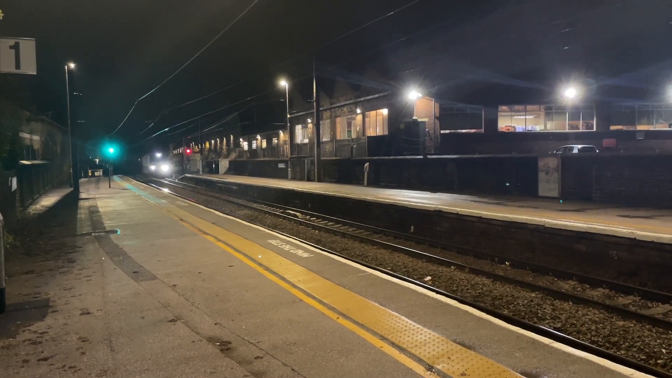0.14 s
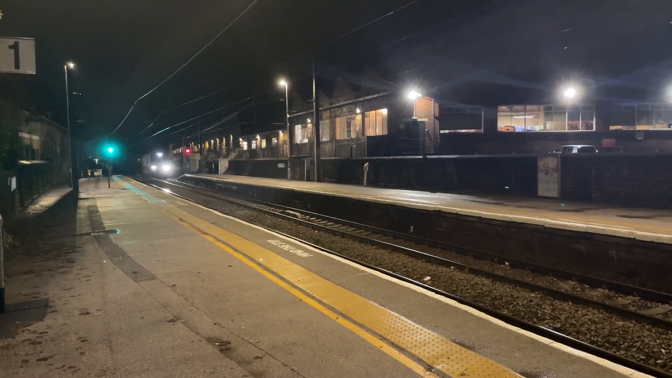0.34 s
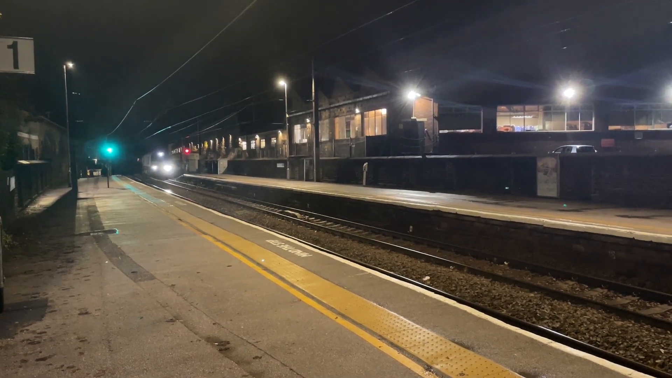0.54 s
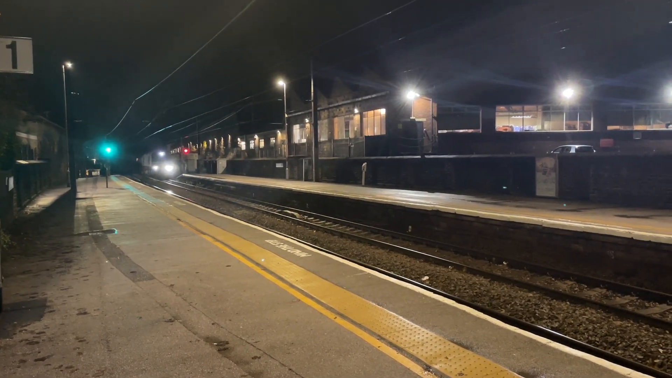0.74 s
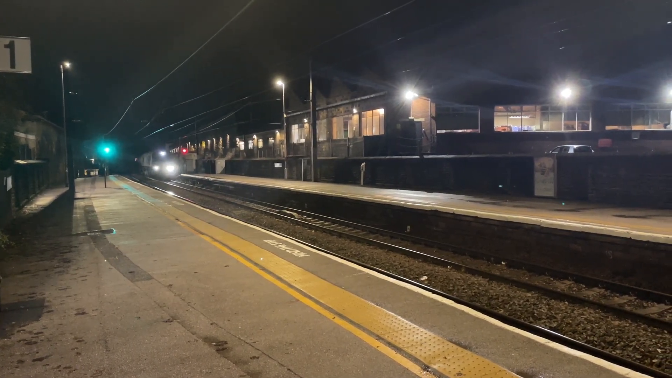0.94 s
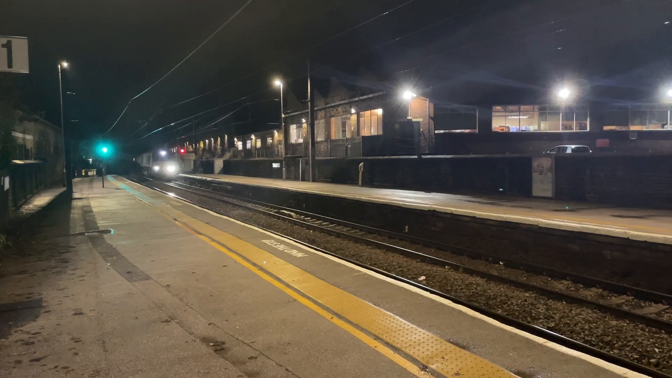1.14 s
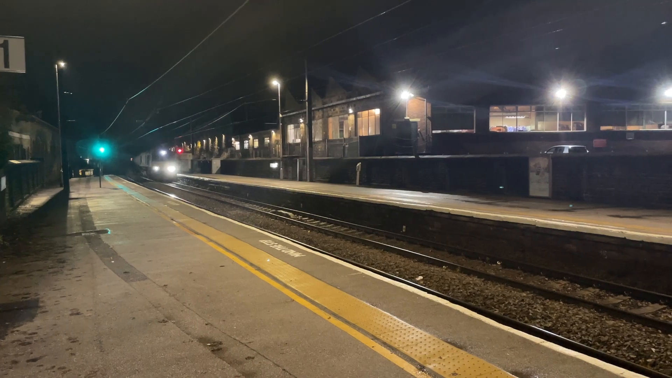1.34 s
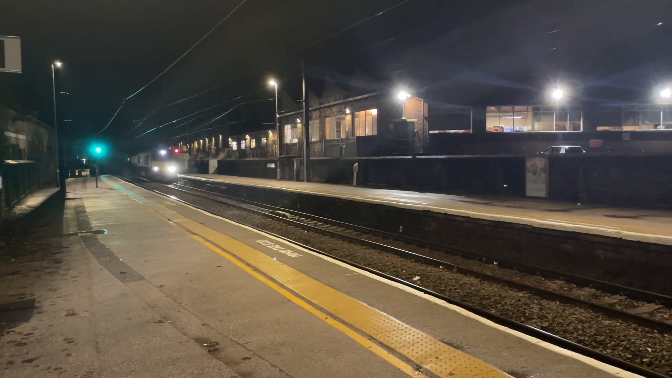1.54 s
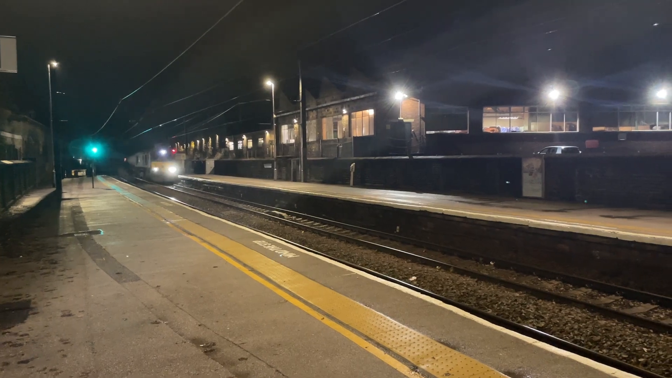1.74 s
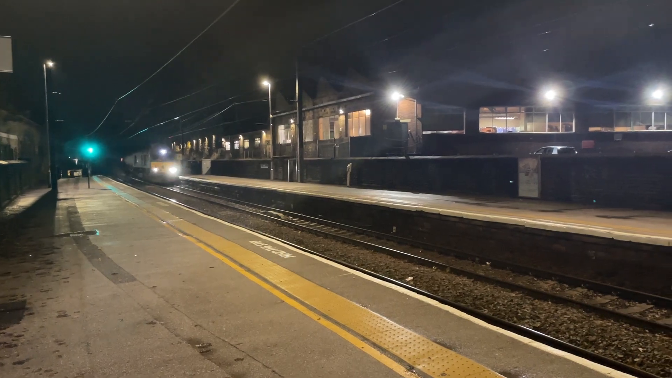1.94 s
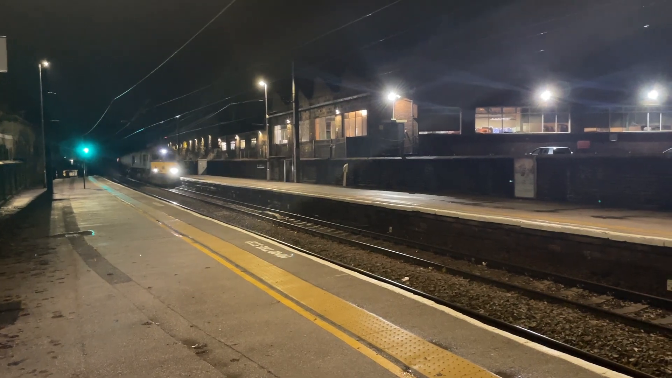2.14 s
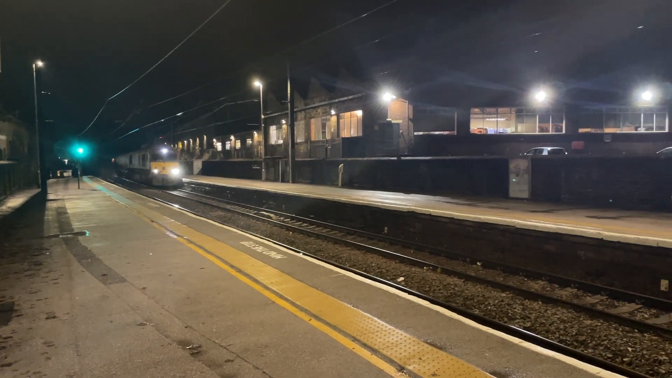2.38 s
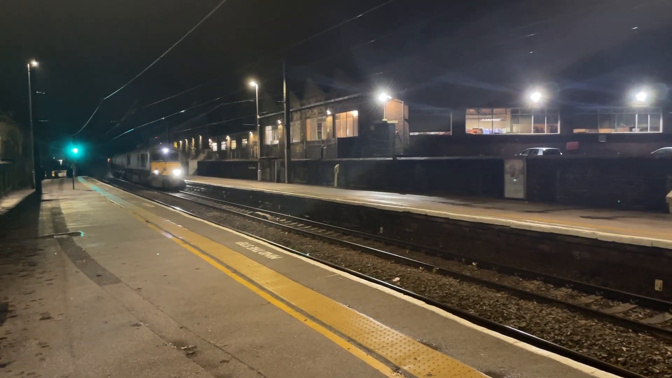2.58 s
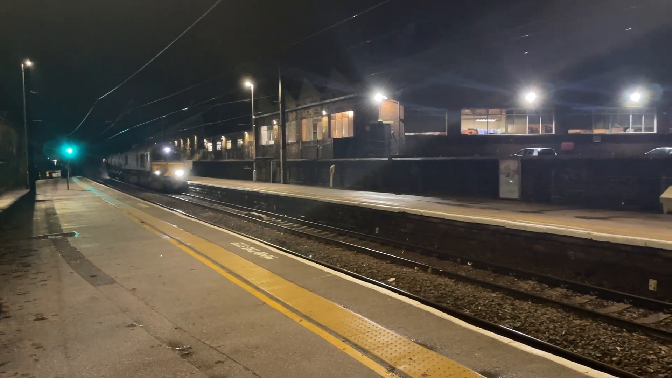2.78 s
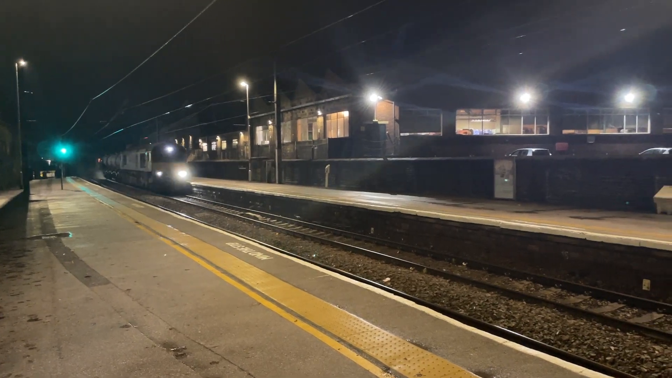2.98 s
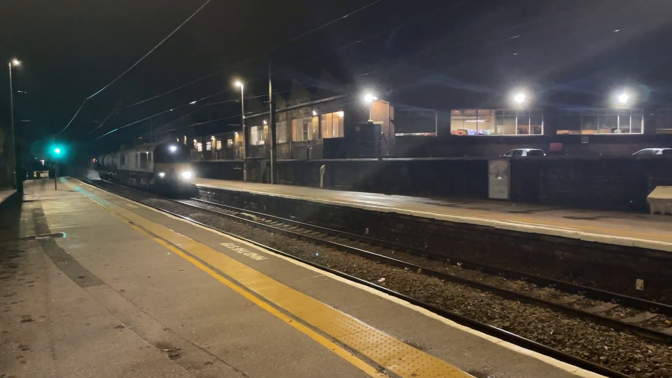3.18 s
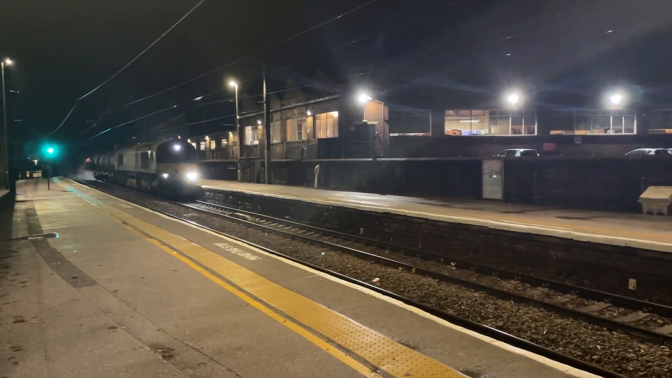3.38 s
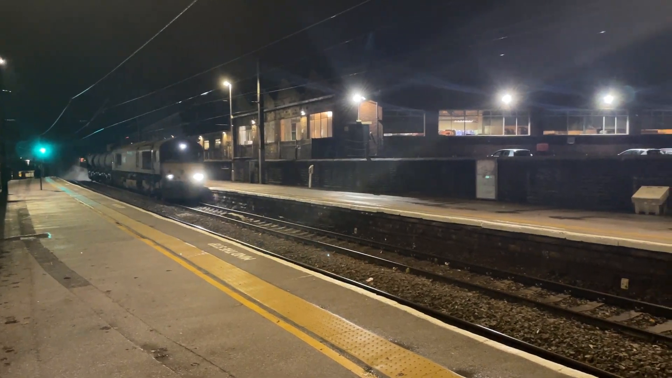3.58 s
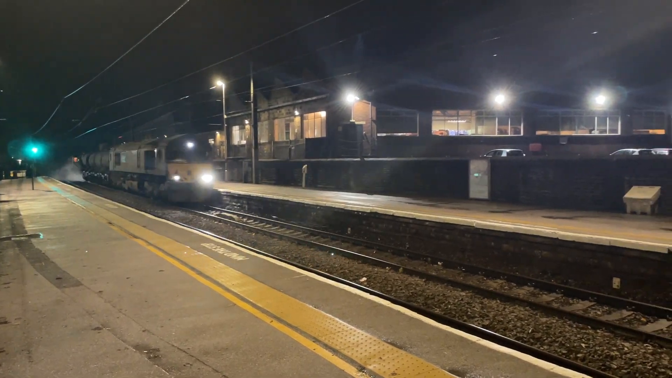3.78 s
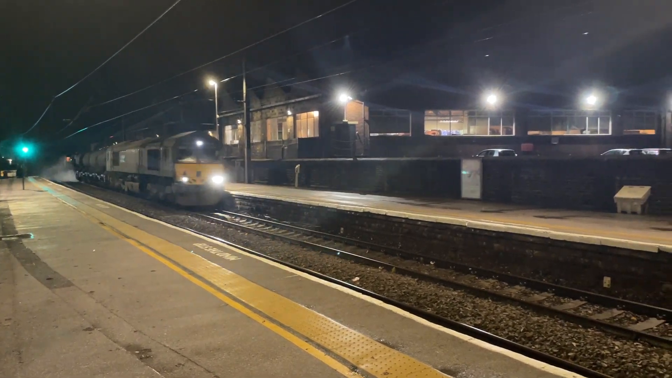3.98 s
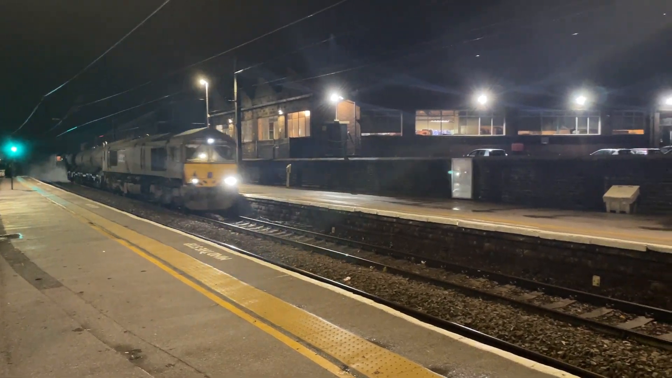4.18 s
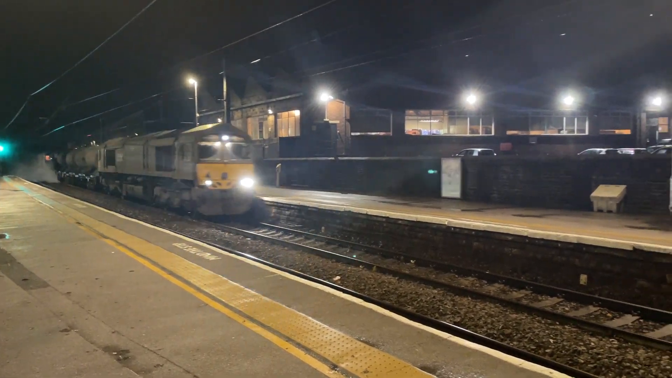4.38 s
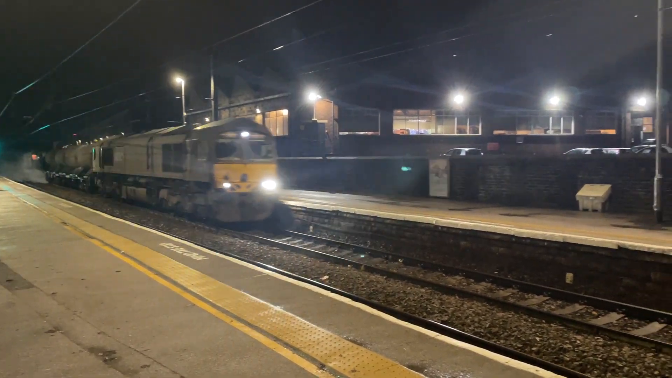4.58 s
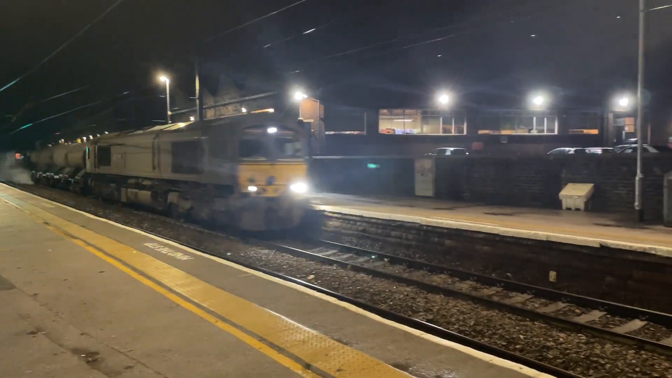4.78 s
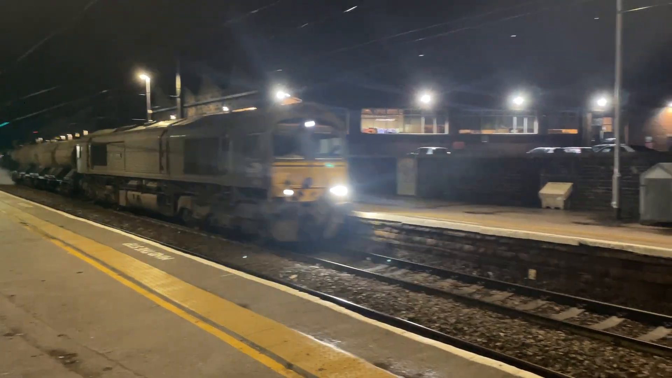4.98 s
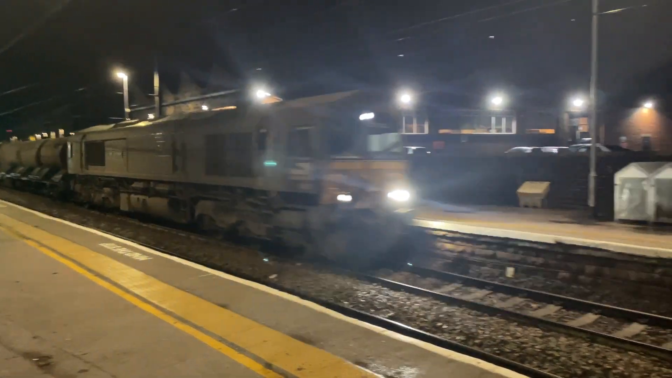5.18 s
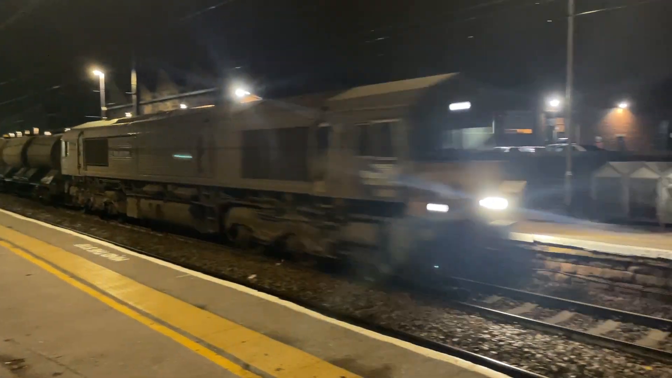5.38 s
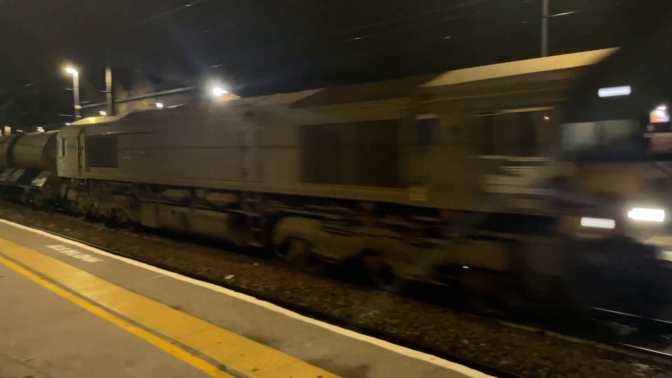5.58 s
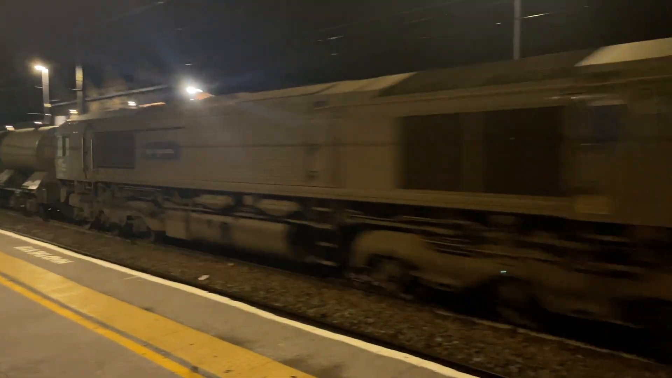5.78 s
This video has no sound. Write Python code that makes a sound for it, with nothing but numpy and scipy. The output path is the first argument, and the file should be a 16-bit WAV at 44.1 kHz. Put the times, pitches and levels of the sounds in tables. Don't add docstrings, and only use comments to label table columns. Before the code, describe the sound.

Heard through two close microphone ports, a diesel freight train approaches. First comes a quiet wet hiss and a faint deep hum, rising and falling in slow swells. Rails ring with short hollow moans, ground rumble thickens, then metallic wheel roar surges rapidly at the end, with brief squealing resonances and more treble as the engine draws alongside.

```python
import sys
import numpy as np
from scipy import signal
from scipy.io import wavfile
from scipy.ndimage import uniform_filter1d

SR = 44100
rng = np.random.default_rng(int(sys.argv[2]) if len(sys.argv) > 2 else 0)


def put_to_file(sound):
    columns = np.atleast_2d(sound).T
    safe = np.clip(columns, -1, 1)
    whole_steps = np.round(safe * 32767)
    wavfile.write(sys.argv[1], SR, whole_steps.astype(np.int16))


def voltage_ratio(level):
    return 10 ** (np.asarray(level, float) / 20)


N = 257085
SIZE, HOP = 2048, 512

# time_s, distance_m
DISTANCE = [
    (0, 133),
    (2.8, 53.5),
    (4.5, 32.7),
    (5.3, 26),
    (5.83, 18.4),
]
# time_s, level_db
APPROACH = [
    (0.0, -46),
    (1.67, -44),
    (3, -40),
    (4.51, -34.5),
    (5.06, -32),
    (5.65, -27),
    (5.83, -26.5),
]


def evened(x):
    return x / np.sqrt(np.mean(x ** 2) + 1e-20)


def smooth_drift(count, size):
    once = uniform_filter1d(rng.standard_normal(count), size=size)
    return evened(uniform_filter1d(once, size=size))


def along(rows, t):
    s, *columns = np.transpose(rows)
    return [np.interp(t, s, c) for c in columns]


def over(rows, hz):
    f, *columns = np.transpose(rows)
    return [np.interp(np.log(hz + 1), np.log(f), c) for c in columns]


def swell(t, middle, length):
    return np.cos(np.pi * np.clip((t - middle) / length, -.5, .5)) ** 2


def swells(rows, t):
    return sum(voltage_ratio(db) * swell(t, middle, length) for middle, length, db in rows)


def wavering(hz, waver_hz):
    tremble = smooth_drift(len(hz), size=900)
    return np.sqrt(2) * np.sin(2 * np.pi * np.cumsum(hz + waver_hz * tremble) / SR)


def closer_db(t):
    return 20 * np.log10(100 / np.clip(along(DISTANCE, t)[0], 1, None))


def layer(shape, level_db, patchy_db, size):
    patches = rng.standard_normal((len(level_db), SIZE // 2 + 1))
    patches = uniform_filter1d(patches, size[0], 0)
    patches = evened(uniform_filter1d(patches, size[1], 1))
    unit = shape / np.sqrt((shape ** 2).sum(-1, keepdims=True))
    return unit * voltage_ratio(level_db[:, None] + patchy_db * patches)


def platform_hiss(t, hz):
    # pitch_hz, density_db per Hz
    drizzle = [(100, -15), (500, -7.5), (1200, -1), (1700, -0.5), (2500, -4), (3100, -1), (4500, -4),
               (7000, -13), (10000, -27.5), (15600, -66)]
    return layer(voltage_ratio(over(drizzle, hz)[0]), -47.5 + 0 * t, patchy_db=0.6, size=(8, 20))


def ground_rumble(t, hz):
    # pitch_hz, density_db per Hz
    rumble = [(20, -40), (35, -25), (44, -1.5), (55, -1), (72, -1.5), (86, -1), (104, -3), (116, -0.5),
              (128, -10.5), (160, -16.5), (250, -53), (500, -110)]
    level_db = -37.5 + 0.73 * closer_db(t) + 3.0
    return layer(voltage_ratio(over(rumble, hz)[0]), level_db, patchy_db=1.0, size=(10, 2))


def engine_drone(t, hz):
    # pitch_hz, density_db per Hz
    drone = [(50, -110), (110, -30), (140, 5), (172, 1), (205, 5), (260, -1), (380, -4.5), (430, -11),
             (550, -5), (1100, -110)]
    level_db = -43.5 + 1.22 * closer_db(t) - 0.5
    return layer(voltage_ratio(over(drone, hz)[0]), level_db, patchy_db=1.0, size=(14, 2))


def rail_rings(t, hz):
    # pitch_hz, width_hz, far_db, near_db
    ring_modes = [(347, 52, -2, -7), (478, 66, -4, -1), (641, 130, -1.5, -4), (712, 290, -9, 1),
                  (828.5, 54, -3.5, -1.5), (958, 35, -32, -6), (1150, 37, -7.5, -16), (1340, 87, -9, -6),
                  (1796, 45, -21, -11.5), (2110, 52, -60, -5.5), (2850, 480, -14.5, -14)]
    # middle_s, length_s, more_ring_db
    surge = (4.9, .7, 2.1)
    near = np.clip(1.1 - along(DISTANCE, t)[0] / 90, 0, 1)[:, None]
    power = 0
    for f, width, far_db, near_db in ring_modes:
        resonance = 1 / (1 + (2 * (hz - f) / width) ** 2) ** 2
        power = power + voltage_ratio(far_db + near * (near_db - far_db)) ** 2 * resonance
    level_db = -35.5 + 0.86 * (along(APPROACH, t)[0] + 40.5) - 2.5
    level_db = level_db + surge[2] * swell(t, surge[0], surge[1])
    return layer(np.sqrt(power), level_db, patchy_db=2.2, size=(14, 3))


def wheel_roar(t, hz):
    # pitch_hz, density_db per Hz
    roar = [(250, -1), (420, 0), (900, -3), (1050, -2), (1600, -5), (2300, -4.5), (2600, -11), (3200, -6.5),
            (5000, -12.5), (8000, -18), (11000, -26.5), (12800, -33), (15600, -34)]
    shape = voltage_ratio(over(roar, hz)[0]) * (hz > 200)
    return layer(shape, along(APPROACH, t)[0] + 3.0, patchy_db=1.32, size=(8, 14))


def air(t, hz):
    metres = np.clip(along(DISTANCE, t)[0], 0, None)
    return voltage_ratio(-12 * np.outer(metres / 100, (hz / 10000) ** 0.63))


def ports(magnitude, hz):
    # pitch_hz, likeness 0-1, left_lead_rad, left_over_right_db
    port_pair = [(60, .998, .1, -2.4), (500, .85, .2, -.5), (1600, .6, -.2, .5), (2800, .66, .9, 4.2),
                 (4000, .7, -.2, 3.8), (5100, .57, .8, 5.2), (6200, .8, -.55, .6), (7450, .86, -2, .5),
                 (7700, .92, -3.15, 0), (8900, .9, -3.78, 0), (10100, .9, -5.05, 0), (10700, .95, -6.2, 0),
                 (12300, .93, -6.7, 0), (12650, .9, -7.6, 0), (13650, .9, -7.85, 0), (13900, .9, -9.4, 0)]
    same, lead, balance_db = over(port_pair, hz)
    same = np.clip(same, 0, 1)
    a, b, c, d = rng.standard_normal((4,) + magnitude.shape)
    left = a + 1j * b
    own = c + 1j * d
    right = (same * left + np.sqrt(1 - same ** 2) * own) * np.exp(-1j * lead)
    z = np.array([left * voltage_ratio(balance_db / 2), right * voltage_ratio(-balance_db / 2)]) * magnitude
    return signal.istft(z.transpose(0, 2, 1), nperseg=SIZE, noverlap=SIZE - HOP)[1][:, :N] * 1.4


def noises():
    t = np.arange(N // HOP + 5) * HOP / SR
    hz = np.fft.rfftfreq(SIZE, 1 / SR)
    through_air = air(t, hz)
    fields = [platform_hiss(t, hz), ground_rumble(t, hz), engine_drone(t, hz),
              through_air * rail_rings(t, hz), through_air * wheel_roar(t, hz)]
    return ports(np.sqrt(sum(field ** 2 for field in fields)), hz)


def rail():
    # middle_s, peak_db
    singing = [(.46, -40), (1.07, -46), (1.36, -39.5), (1.72, -40), (1.91, -42.5), (2.09, -42),
               (2.57, -36.5), (3.04, -42), (3.3, -39.5), (3.6, -36.5), (4.03, -39)]
    # middle_s, length_s, pitch_hz, peak_db
    howls = [(.1, .3, 660, -45), (0.498, .8, 637, -54), (1.45, .45, 849, -47.5), (1.399, .5, 628, -46),
             (1.844, .4, 1270, -52), (2.15, .6, 831, -45), (2.505, .35, 652, -61), (2.7, .3, 485, -45.5),
             (2.915, .46, 658, -42.5), (2.952, .3, 106, -34), (3.797, .6, 245, -38.5),
             (4.334, .25, 110, -32), (4.405, .25, 347, -39), (4.4, .5, 482, -47), (4.4, .5, 825, -39),
             (4.683, .25, 952, -39), (4.898, .35, 372, -34), (4.95, .25, 816, -34), (5.198, .5, 725, -33.5),
             (5.199, .39, 242, -36.5), (5.296, .31, 337, -35.5), (5.297, .5, 949, -37),
             (5.32, .15, 1310, -36), (5.58, .3, 484, -29.5), (5.547, .3, 705, -41),
             (5.684, .15, 1375, -31.5), (5.7, .3, 211, -34), (5.715, .2, 1700, -44), (5.75, .1, 2160, -36),
             (5.791, .16, 715, -31)]
    t = np.arange(N) / SR
    sing_hz, sing_s = 211, 0.31
    out = swells([(s, sing_s, db) for s, db in singing], t) * wavering(sing_hz + 0 * t, waver_hz=4.1)
    for middle, length, hz, db in howls:
        on = abs(t - middle) < length / 2
        hump = np.sqrt(swell(t[on], middle, length))
        out[on] += voltage_ratio(db) * hump * wavering(hz + 0 * t[on], waver_hz=5.26)
    return out * voltage_ratio(np.array([[-.4], [.4]]))


def exhaust():
    # time_s, pitch_hz
    firing = [
        (0, 85.6),
        (5.2, 85.6),
        (5.5, 85.2),
        (5.83, 83.5),
    ]
    # middle_s, length_s, peak_db
    firing_swells = [(.06, .35, -41), (.48, 0.34, -33), (.94, 0.53, -34), (1.4, 0.74, -39),
                     (1.87, 0.91, -31), (2.41, 0.43, -27), (2.93, 0.71, -27.5), (3.6, 0.75, -25),
                     (4.06, 0.61, -20.5), (4.42, 0.8, -20.5), (4.85, 0.48, -22), (5.12, 0.53, -28),
                     (5.39, 0.21, -24), (5.59, 0.26, -25.5), (5.83, 0.22, -22.5)]
    # middle_s, length_s, peak_db
    octave_swells = [(0, 0.37, -44), (1.05, 1.46, -45.5), (1.7, 1.6, -39), (2.5, 0.99, -41.5),
                     (3.2, 0.59, -39.5), (3.62, 0.82, -30.5), (4.02, 0.7, -32), (4.43, 0.87, -27),
                     (4.85, 0.34, -30), (5.2, .4, -28), (5.41, 0.29, -26), (5.62, 0.45, -31),
                     (5.83, .25, -26)]
    t = np.arange(N) / SR
    sway = smooth_drift(N, size=5000)
    turn = 2 * np.pi * np.cumsum(along(firing, t)[0]) / SR
    lag = np.array([[0], [.12]])
    steady = voltage_ratio(-41.5 + .2 * closer_db(t))
    tones = (steady + swells(firing_swells, t)) * np.sin(turn - lag + .2 * sway)
    tones += swells(octave_swells, t) * np.sin(2 * turn - lag + .4 + .1 * sway)
    return np.sqrt(2) * tones * voltage_ratio(np.array([[-1.1], [1.1]]))


def scene():
    return noises() + rail() + exhaust()


def top_cut(x):
    return signal.sosfilt(signal.butter(12, 15700, fs=SR, output="sos"), x)


def record(dry):
    heard = signal.sosfilt(signal.butter(7, 41, "high", fs=SR, output="sos"), dry)
    heard = heard * signal.windows.tukey(N, .001)
    return top_cut(heard)


dry = scene()
out = record(dry)
put_to_file(out)
```